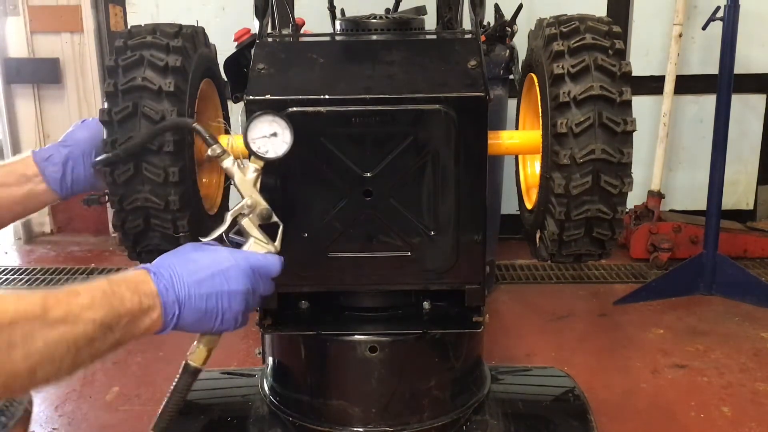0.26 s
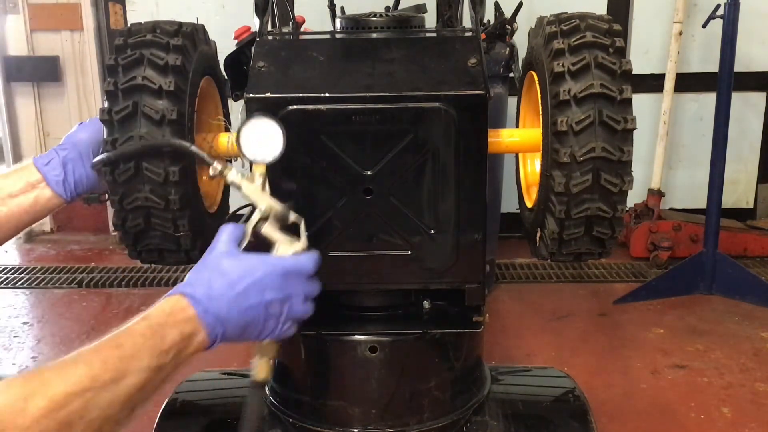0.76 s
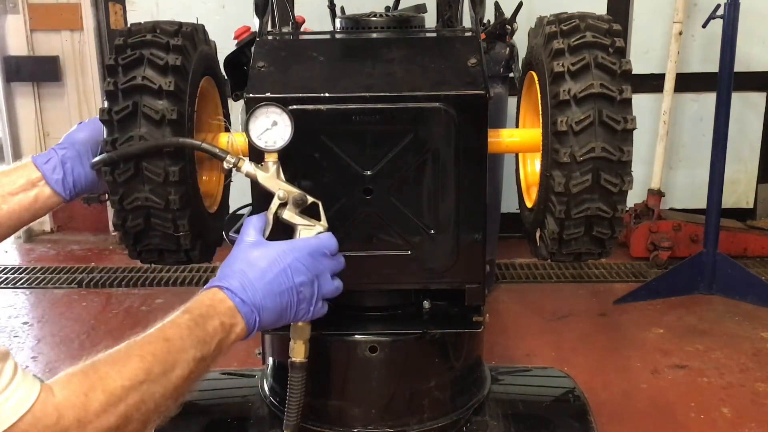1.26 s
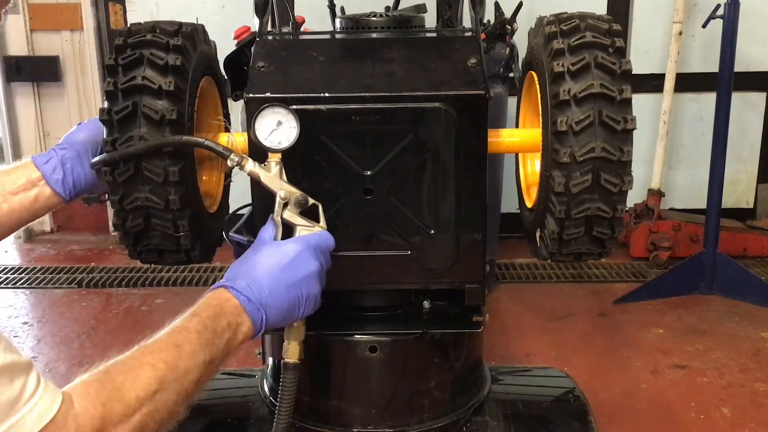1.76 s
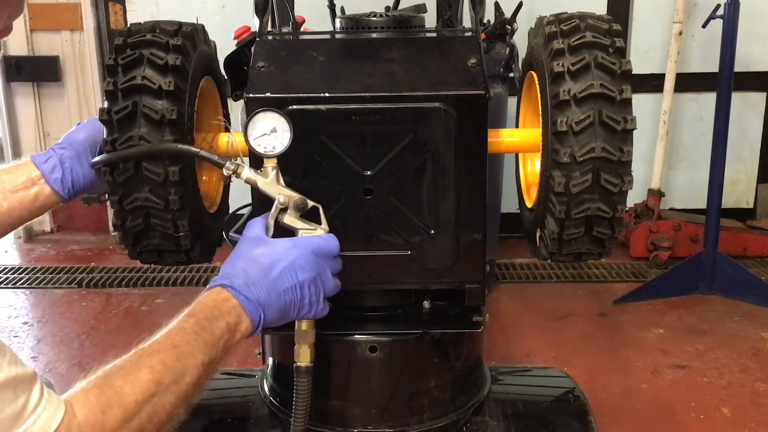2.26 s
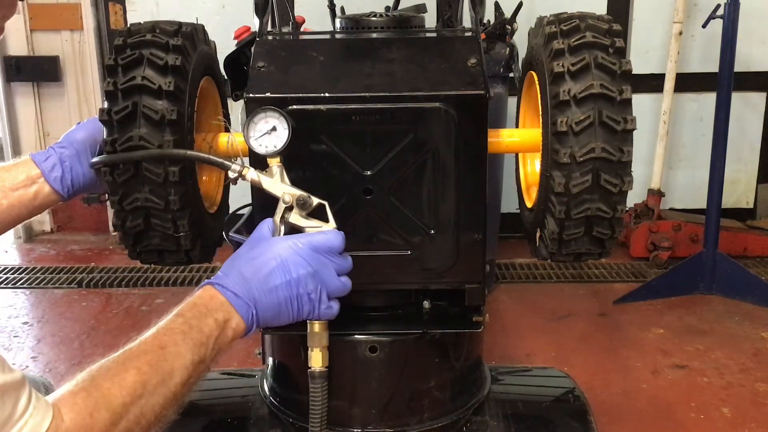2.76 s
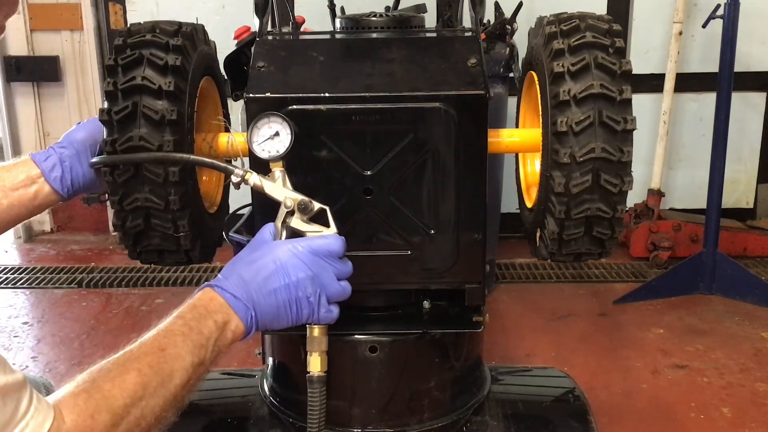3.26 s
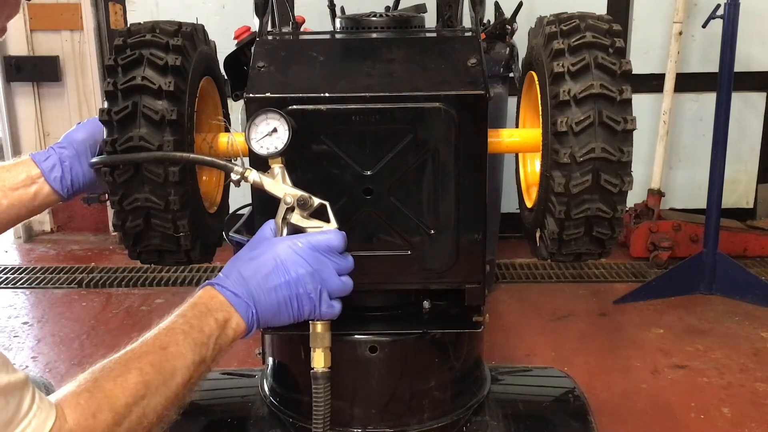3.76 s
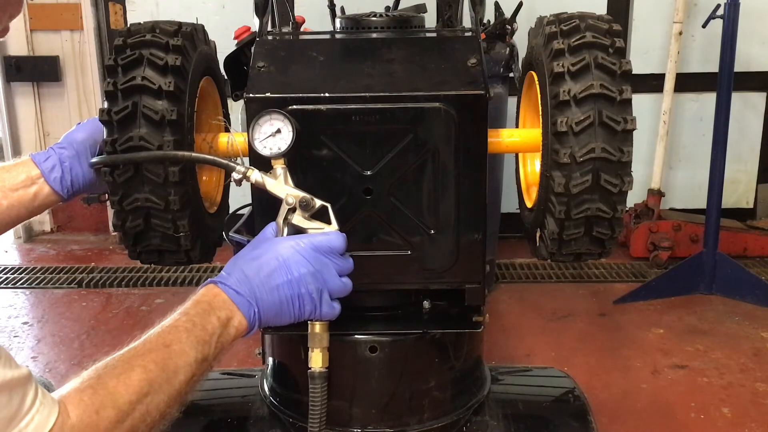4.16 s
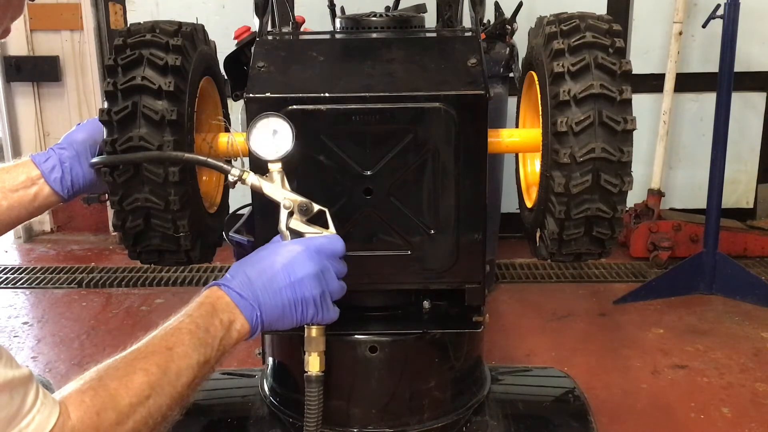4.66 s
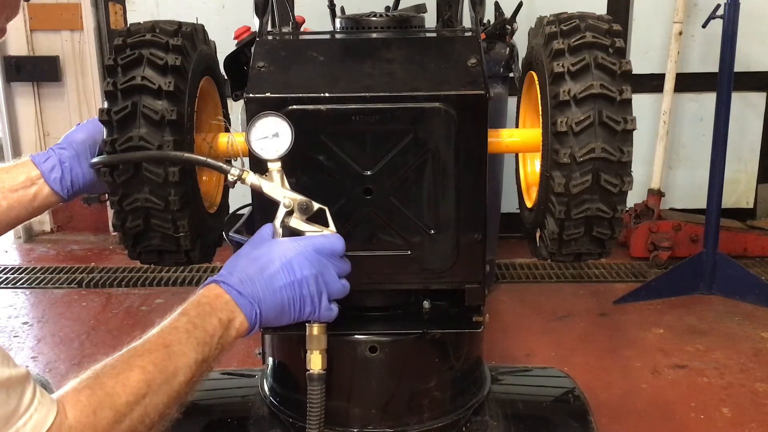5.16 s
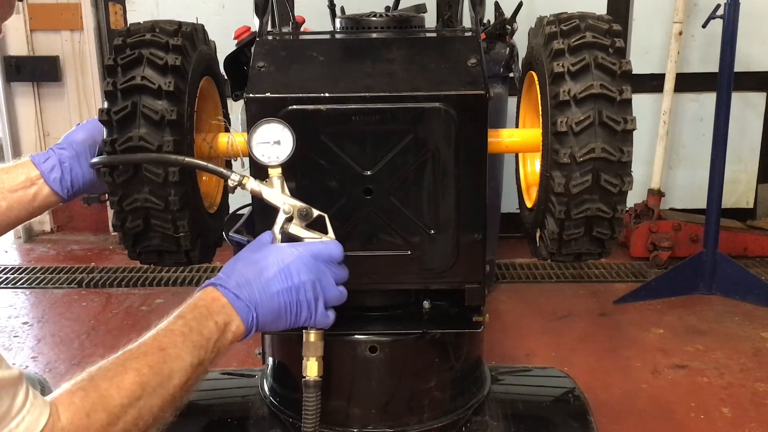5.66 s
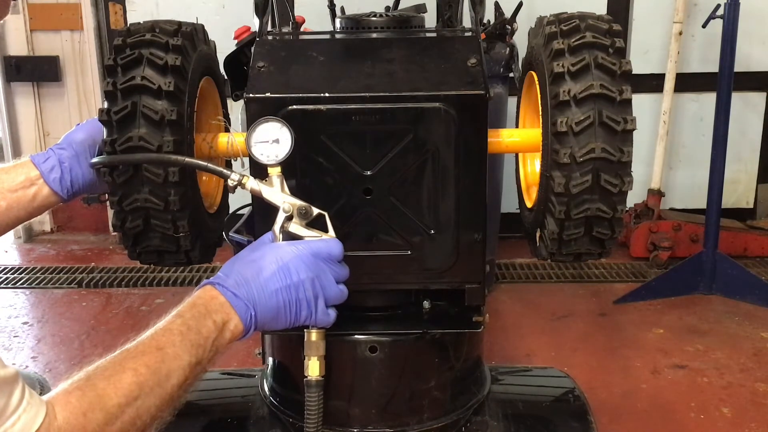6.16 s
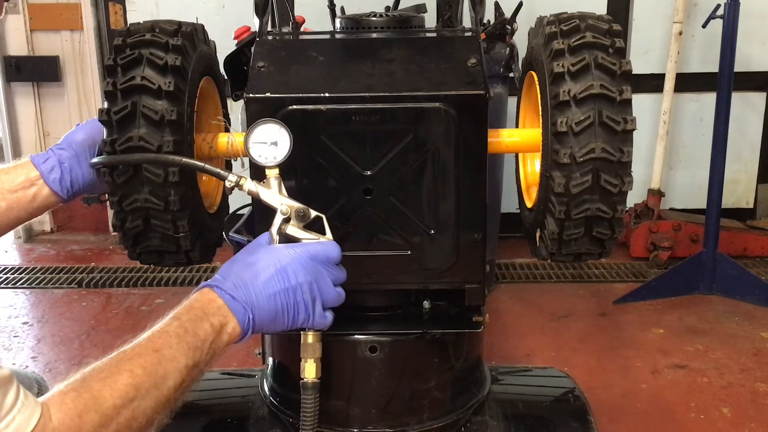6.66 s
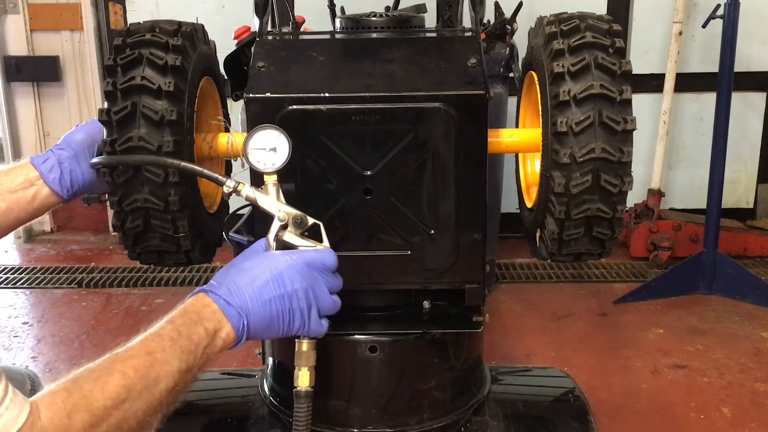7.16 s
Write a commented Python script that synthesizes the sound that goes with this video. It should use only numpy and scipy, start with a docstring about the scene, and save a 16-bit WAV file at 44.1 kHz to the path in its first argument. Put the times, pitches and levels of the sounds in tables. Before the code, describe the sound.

Soft tire bumps and small metal ticks, then brief sharp rushes of compressed air, over droning cicadas and a faint garage hum.

```python
"""A garage with its door open, where a handheld inflator fills a flat tire.
The hose bumps and the gauge clicks, dull and bright ringing modes struck by short noise cracks; then the
trigger valve snaps and air rushes in short bursts, shaped noise with a few sliding whistles.
Outside two cicadas, stacks of partials, buzz and wind down one after the other over a distant chorus of
shaped noise; the garage hums faintly."""
import sys
import numpy as np
from scipy import signal
from scipy.fft import rfft, irfft
from scipy.io import wavfile
from scipy.ndimage import uniform_filter1d

SR = 44100
rng = np.random.default_rng(int(sys.argv[2]) if len(sys.argv) > 2 else 0)


def inscribe(sig):
    """Save sig as 16-bit PCM at rate SR to the path in sys.argv[1].

    A 1-D sig is mono; a 2-D sig holds one channel per row.
    Samples are clipped to [-1, 1] before scaling.
    """
    pcm = np.round(np.clip(np.atleast_2d(sig).T, -1, 1) * 32767)
    wavfile.write(sys.argv[1], SR, pcm.astype(np.int16))


N = 326340
TIME = np.arange(N) / SR


def from_db(db):
    """Decibels to gain."""
    return np.exp(np.asarray(db) * (np.log(10) / 20))


def rms_one(x):
    """Scale to unit power."""
    return x / np.sqrt(np.mean(x ** 2) + 1e-20)


def drift(rate_hz):
    """Slow chance with spread 1: noise smoothed by two equal poles at the given rate."""
    step = 40  # drawn at every 40th sample, joined by straight lines
    settling = 2000
    pole = np.exp(-2 * np.pi * rate_hz * step / SR)
    white = rng.standard_normal(N // step + settling + 2)
    slow = signal.lfilter([1], [1, -2 * pole, pole ** 2], white)[settling:]
    return np.interp(np.arange(N) / step, np.arange(len(slow)), rms_one(slow))


def noise(colour, resonances=()):
    """Turbulence with a broad colour, lifted at its resonances; rms 1."""
    hz = np.arange(N // 2 + 1) * SR / N + 1e-6
    colour_hz, colour_db = np.transpose(colour)
    gain = from_db(np.interp(np.log(hz), np.log(colour_hz), colour_db))
    for centre_hz, width_hz, lift_db in resonances:
        bell = 1 / (1 + (2 * (hz - centre_hz) / width_hz) ** 2)
        gain = gain * np.sqrt(1 + (from_db(lift_db) ** 2 - 1) * bell)
    return rms_one(irfft(rfft(rng.standard_normal(N)) * gain, N))


def held(start, end, rise_db_per_s, fall_db_per_s):
    """A gain that rises to 1 at the start, holds, and dies away after the end."""
    before = rise_db_per_s * np.maximum(start - TIME, 0)
    after = fall_db_per_s * np.maximum(TIME - end, 0)
    return from_db(-np.minimum(before + after, 200))


def soften(x, edge_hz):
    """Low-pass: a softer or lighter contact sounds duller."""
    return signal.sosfilt(signal.butter(2, edge_hz, fs=SR, output="sos"), x)


GARAGE_T60_S = 0.84


def garage(x, wet_db):
    """Direct sound plus a dense tail from the walls, its treble dying sooner."""
    t = TIME[:SR]
    white = rng.standard_normal(SR)
    low = signal.sosfilt(signal.butter(1, 5000, fs=SR, output="sos"), white)
    high = white - low
    tail = low * from_db(-60 * t / GARAGE_T60_S) + high * from_db(-60 * t / (0.4 * GARAGE_T60_S))
    tail = tail * (t > 0.006)  # a gap before the first reflection
    echo = signal.fftconvolve(x, tail / np.linalg.norm(tail))[:N]
    return x + from_db(wet_db) * echo


def strikes(hits, modes, crack_db, crack_s):
    """Each contact is a short noise crack plus the ringing modes; a soft contact is low-passed."""
    out, t = np.zeros(N), TIME[:SR // 2]
    for start_s, level_db, *softness in hits:
        hit = from_db(crack_db) * rng.standard_normal(len(t)) * np.exp(-t / crack_s)
        for k, (hz, mode_db, t60_s) in enumerate(modes):
            ring_db = mode_db + rng.normal(0, 1) - 60 * t / t60_s
            hit += (-1) ** k * from_db(ring_db) * np.sin(2 * np.pi * hz * t)
        for edge_hz in softness:
            hit = soften(hit, edge_hz)
        at = int(start_s * SR)
        out[at:at + len(t)] += from_db(level_db) * hit[:N - at]
    return out


# Garage background. Each row: frequency in Hz, relative density in dB per Hz.
AMBIENCE_COLOUR = [(25, -21), (40, -53), (54, -2.5), (70, -7), (100, -0.5), (125, 1.5), (170, -5.5),
                   (290, -8.5), (450, -14.5), (800, -19), (1200, -23.5), (2000, -31.5), (4000, -34),
                   (16000, -57)]
AMBIENCE_DB = -59


def ambience():
    """The steady, bass-heavy noise of the garage."""
    return from_db(AMBIENCE_DB) * noise(AMBIENCE_COLOUR)


HUM_HZ, HUM_DB = 134.7, -63.5


def motor_hum():
    """A motor's single low tone, its level and phase wandering a little."""
    phase = 2 * np.pi * HUM_HZ * TIME + 0.49 * drift(3.3)
    return from_db(HUM_DB + 1.6 * drift(4.6)) * np.sin(phase)


# The distant band rises and falls. Each row: time in seconds, mean level in dB.
CHORUS_LEVEL = [(0.05, -51.5), (0.85, -55), (2.2, -52), (2.9, -50.5), (3.75, -51.5), (4.35, -50.5),
                (5.2, -54.5), (6.13, -52.5), (7.2, -52.5)]
# Their blended spectrum. Each row: frequency in Hz, relative density in dB per Hz.
CHORUS_COLOUR = [(2500, -49), (3600, -33), (4200, -22), (4800, -13), (5500, -5.5), (6500, -1), (7500, 1.5),
                 (8500, -1.5), (9400, -4), (10300, -11), (11500, -13.5), (12800, -17.5), (14500, -22.5),
                 (16000, -28)]


def distant_chorus():
    """Many far insects melt into one band of shimmering noise."""
    time_s, level_db = np.transpose(CHORUS_LEVEL)
    shimmer_db = 1.27 * drift(29)
    return from_db(np.interp(TIME, time_s, level_db) + shimmer_db) * noise(CHORUS_COLOUR)


# A tired cicada slows as this power of time and is silent once it has lost this many cycles per s.
TIRING_POWER, STALL_HZ = 2.6, 34.2


def song(pace, effort):
    """A cicada swells at a steady or climbing pace, then tires, slows and stalls: its rate and gain."""
    tires_s, top_rate, climb, slowing = pace
    full_db, full_s, swell, fade = effort
    tired = np.maximum(TIME - tires_s, 0)
    lost = np.minimum(slowing * tired ** TIRING_POWER, STALL_HZ)
    rate = top_rate - climb * np.maximum(tires_s - TIME, 0) - lost
    gain = from_db(full_db) * held(full_s, tires_s, swell, fade) * (1 - lost / STALL_HZ)
    return rate, gain


def cicada(pace, effort, partials, scatter, glide_scatter):
    """Tymbals buckle at a regular rate, giving a stack of partials that echoes in the yard make flutter."""
    rate, gain = song(pace, effort)
    phase = 2 * np.pi * (np.cumsum(rate) / SR % 1)
    # while the song slows, echoes of the earlier pitch blur each partial and make it swell and fade
    slowing = uniform_filter1d(np.maximum(-np.gradient(rate) * SR, 0), SR // 4)
    blur = scatter + glide_scatter * np.sqrt(np.abs(slowing))
    swing_db = 3.0 + 2.0 * np.tanh(slowing)
    buzz, power = 0, 0
    for multiple, partial_db in partials:
        path = rng.uniform(0, 2 * np.pi) + blur * drift(9.8)
        strength = from_db(partial_db + swing_db * drift(5.15))
        buzz = buzz + strength * np.cos((multiple * phase + path).astype(np.float32))
        power = power + strength ** 2 / 2
    # evening out the summed power leaves the loudness to the song's own gain
    return gain * buzz / np.sqrt(uniform_filter1d(power, SR // 2))


# First buzz. Each row: multiple of the tymbal rate, relative level in dB.
FIRST_PARTIALS = [(22,-29), (24,-20), (25,-23), (26,-23), (27,-20), (28,-10), (29,-15), (30,-7), (31,-15),
                  (32,-16), (33,-6), (34,-16), (35,0), (36,-10), (37,0), (38,-11), (39,-3), (40,-7),
                  (41,-14), (42,-2), (43,-9), (44,-11), (45,-10), (46,-6), (48,-16), (49,-18), (50,-20),
                  (52,-22), (55,-27)]
# Its pace: when it tires in seconds, cycles per s then, climb before it in cycles per s each s,
# cycles per s lost in the first second of tiring.
FIRST_PACE = (1.55, 194.42, 0, 1.9)
# Its effort: full level in dB, when it is reached in seconds, swell in dB per s, tired fade in dB per s.
FIRST_EFFORT = (-46, 0.62, 4, 1.3)


def first_cicada():
    """The cicada that tires first, holding a steady tymbal rate until it winds down."""
    return cicada(FIRST_PACE, FIRST_EFFORT, FIRST_PARTIALS, scatter=0.11, glide_scatter=0.31)


# Second buzz. Each row: multiple of the tymbal rate, relative level in dB.
SECOND_PARTIALS = [(18,-31), (22,-29), (26,-15), (27,-19), (28,-4), (30,-9), (31,-17), (32,-8), (34,-12),
                   (35,-14), (36,-3), (37,-15), (38,-3), (39,-8), (40,-3), (41,-8), (42,-7), (43,-9),
                   (44,-6), (45,-6), (46,-14), (47,-1), (48,-11), (49,-8), (50,-14), (51,-11), (53,-17),
                   (55,-20), (58,-21), (60,-22), (62,-19), (64,-21), (66,-23)]
# Its pace: when it tires in seconds, cycles per s then, climb before it in cycles per s each s,
# cycles per s lost in the first second of tiring.
SECOND_PACE = (5.55, 198.44, 0.61, 8.0)
# Its effort: full level in dB, when it is reached in seconds, swell in dB per s, tired fade in dB per s.
SECOND_EFFORT = (-45, 4, 3.8, 6.5)


def second_cicada():
    """The later cicada swells and its tymbals quicken before it winds down."""
    return cicada(SECOND_PACE, SECOND_EFFORT, SECOND_PARTIALS, scatter=0.14, glide_scatter=0.27)


# Hose and hand bump the tire. Each row: start in seconds, level in dB, brightness in Hz.
BUMPS = [(.1135, -35, 1010), (.119, -31.5, 402), (.138, -37, 200), (.152, -48, 300), (1.34, -47, 350)]
# How the tire rings. Each row: frequency in Hz, relative level in dB, t60 in seconds.
TIRE_MODES = [(77, -10, 0.12), (104.6, -5, 0.13), (206, -15, 0.13), (267, -8.5, 0.13), (292.5, -8, 0.2),
              (373, -11, 0.094), (615, -13, .12), (784, -6.5, 0.048), (1720, -21, .04)]


def tire_bumps():
    """Dull thuds: soft blows set the low modes of the tire ringing."""
    return garage(strikes(BUMPS, TIRE_MODES, crack_db=1.5, crack_s=0.015), wet_db=-6.5)


# Light clicks of lever and coupling. Each row: start in seconds, level in dB before the trim,
# brightness in Hz.
CLICKS = [(.2115, -34, 16000), (.384, -44, 3000), (.3912, -38.5, 5000), (.4503, -30.5, 15100),
          (.453, -34, 9100), (.672, -49.5, 15000), (.712, -49, 15000), (.9144, -49, 2500),
          (1.2252, -51, 3000), (6.692, -52, 2500)]
# How the light metal rings. Each row: frequency in Hz, relative level in dB, t60 in seconds.
LEVER_MODES = [(2390, -4.5, 0.017), (3410, -9.5, 0.017), (4580, -4, 0.022), (5840, -3, 0.018),
               (7600, 0, 0.022), (11400, -4, 0.0054), (12200, 3.5, 0.006), (14500, 1, .007)]
CLICK_TRIM_DB = -5.0


def lever_clicks():
    """Small metal parts tick: high modes that die within hundredths of a second."""
    clicks = strikes(CLICKS, LEVER_MODES, crack_db=-3, crack_s=0.0062) * from_db(CLICK_TRIM_DB)
    # small parts radiate no bass
    clicks = signal.sosfilt(signal.butter(2, 1800, "high", fs=SR, output="sos"), clicks)
    return garage(clicks, wet_db=-5.5)


# The hose knocks against the gun. Each row: start in seconds, level in dB, brightness in Hz.
KNOCKS = [(.611, -44, 990), (.628, -48, 1220), (.65, -48.5, 500)]
# How the knocked hose rings. Each row: frequency in Hz, relative level in dB, t60 in seconds.
HOSE_KNOCK_MODES = [(168, -10, 0.22), (318, -5, 0.1), (393.6, -1, 0.1), (439, 1, 0.052), (615, 1, 0.048),
                    (760, -20, 0.046), (920, -7.5, 0.087), (1480, -20, 0.087)]


def hose_knocks():
    """Muffled knocks: the hose strikes, setting its low and middle modes ringing."""
    return garage(strikes(KNOCKS, HOSE_KNOCK_MODES, crack_db=4.5, crack_s=0.019), wet_db=-6.5)


# The valve snaps open. Each row: start in seconds, level in dB.
SNAPS = [(1.7228, -34), (4.5665, -36), (5.3977, -40.5)]
# How the valve rings. Each row: frequency in Hz, relative level in dB, t60 in seconds.
VALVE_MODES = [(814, -18.5, 0.12), (1544, -8, 0.02), (2255, -13.5, 0.09), (3440, -7.5, 0.053),
               (4060, -14, 0.048), (4820, 1, 0.024), (5110, 3, 0.048)]


def valve_snaps():
    """Hard, bright snaps: the valve's metal modes ring without any softening."""
    return garage(strikes(SNAPS, VALVE_MODES, crack_db=-2, crack_s=0.0055), wet_db=-5.5)


# Squeezes of the trigger. Each row: valve open in seconds, released in seconds, rush in the hose in dB
# and jet at the valve in dB (both before make-up gain), time the jet takes to swell in seconds.
SQUEEZES = [(1.736, 1.911, -47, -55, 0.058), (4.58, 4.794, -47, -40, 0.18),
            (5.411, 5.585, -46.5, -39, 0.16), (6.361, 6.41, -53, -49, 0.063)]
# Colour of the rush. Each row: frequency in Hz, relative density in dB per Hz.
RUSH_COLOUR = [(200, -12), (450, -7), (750, -7.5), (1300, -9), (1950, -8), (2400, 1), (3300, -4.5),
               (4300, 0.5), (5200, 6.5), (6200, 7), (8000, 2.5), (10500, 9), (11500, -1), (15000, -13)]
# Air column of hose and gun. Each row: resonance in Hz, width in Hz, lift in dB.
HOSE_RESONANCES = [(716, 22, 11), (1110, 60, 11), (1540, 22, 8), (1650, 26, 17), (2160, 50, 6),
                   (2690, 40, 7), (2795, 36, 11), (3030, 22, 12), (3400, 28, 19), (3820, 24, 17),
                   (4200, 36, 12), (4295, 28, 15), (4650, 40, 8), (4755, 28, 13), (5195, 36, 14),
                   (6410, 22, 12)]
# Colour of the jet. Each row: frequency in Hz, relative density in dB per Hz.
JET_COLOUR = [(1000, -19.5), (2000, -10.5), (3000, -6), (4400, -2.5), (6000, -2.5), (8000, -2.5),
              (10500, -0.5), (12000, 3.5), (13800, 5), (15200, 6.5), (16000, 3)]
RUSH_MAKEUP_DB, JET_MAKEUP_DB = 6.0, 4.5
# the rush builds up to the opening and dies after the release
RUSH_RISE_DB_PER_S, RUSH_FALL_DB_PER_S = 393, 113
# the jet starts as the seal lifts, a little before the valve is open, and swells as a power of time
JET_LEAD_S, JET_SWELL_POWER, JET_FALL_DB_PER_S = 0.083, 1.47, 138
# the valve seats slowly and seeps on, dying away slowly; its level is before the jet's make-up gain
SEEP_FROM_S, SEEP_TO_S, SEEP_DB, SEEP_FALL_DB_PER_S = 5.6, 5.88, -62, 50.0


def air():
    """Air rushes through the resonant hose and, with the valve wide open, hisses as a gritty jet."""
    rush_gain = 0
    jet_gain = from_db(SEEP_DB) * held(SEEP_FROM_S, SEEP_TO_S, RUSH_RISE_DB_PER_S, SEEP_FALL_DB_PER_S)
    for opened, released, rush_db, jet_db, swell_s in SQUEEZES:
        flow = held(opened, released, RUSH_RISE_DB_PER_S, RUSH_FALL_DB_PER_S)
        rush_gain = rush_gain + from_db(rush_db) * flow
        gap = np.clip((TIME - opened + JET_LEAD_S) / swell_s, 0, 1)
        release = held(opened, released, 0, JET_FALL_DB_PER_S)
        jet_gain = jet_gain + from_db(jet_db) * gap ** JET_SWELL_POWER * release
    # the fast wander of the jet's level is its grit
    rush = rush_gain * from_db(RUSH_MAKEUP_DB + 0.53 * drift(50)) * noise(RUSH_COLOUR, HOSE_RESONANCES)
    jet = jet_gain * from_db(JET_MAKEUP_DB + 0.6 * drift(400)) * noise(JET_COLOUR)
    return rush + jet


# The glove scuffs on the gun. Each row: start in seconds, length in seconds, level in dB, brightness in Hz.
RUBS = [(2.69, 0.035, -65, 3200), (3.705, 0.035, -61, 2180), (7.358, 0.05, -50.5, 16000)]
# Colour of the friction. Each row: frequency in Hz, relative density in dB per Hz.
RUB_COLOUR = [(100, -19), (350, -1), (700, 5), (1400, -6), (2300, -3), (4000, -2), (7000, -5.5),
              (11000, -23), (16000, -20)]
RUB_RISE_DB_PER_S, RUB_FALL_DB_PER_S = 292, 122


def glove_rubs():
    """Short, uneven strokes of rubber on metal; a light one is duller."""
    out = np.zeros(N)
    friction = from_db(1.5 * drift(120)) * noise(RUB_COLOUR)
    for start_s, length_s, level_db, edge_hz in RUBS:
        stroke = friction * held(start_s, start_s + length_s, RUB_RISE_DB_PER_S, RUB_FALL_DB_PER_S)
        out += from_db(level_db) * soften(stroke, edge_hz)
    return out


# The valve seat whistles as its gap changes. Each row: start in seconds, length in seconds,
# first pitch in Hz, last pitch in Hz, peak level in dB.
WHISTLES = [(4.706, 0.1, 5050, 3820, -45.5), (6.305, 0.13, 6300, 4160, -52)]
# a whistle peaks after this share of its length and is this much weaker at its ends
WHISTLE_PEAK_SHARE, WHISTLE_EDGE_DB = 0.13, -16


def whistles():
    """Breathy edge tones that slide down in pitch."""
    out = np.zeros(N)
    for start_s, length_s, first_hz, last_hz, peak_db in WHISTLES:
        along = np.clip((TIME - start_s) / length_s, 0, 1)
        sounding = (along > 0) & (along < 1)
        swell_db = np.interp(along, [0, WHISTLE_PEAK_SHARE, 1], [WHISTLE_EDGE_DB, 0, WHISTLE_EDGE_DB])
        pitch_hz = first_hz * (last_hz / first_hz) ** along
        phase = 2 * np.pi * np.cumsum(pitch_hz) / SR
        # chance on both quadratures spreads the tone into a narrow, breathy band
        tone = drift(70) * np.cos(phase) + drift(70) * np.sin(phase)
        out += sounding * from_db(peak_db + swell_db) * tone
    return garage(out, wet_db=-11)


def scene():
    """The inflator close by, the insects beyond the door, one microphone."""
    background = ambience() + motor_hum()
    insects = distant_chorus() + first_cicada() + second_cicada()
    handling = tire_bumps() + lever_clicks() + hose_knocks() + valve_snaps() + glove_rubs()
    mono = background + insects + handling + air() + whistles()
    return np.array([mono, mono])


CUTOFF_HZ = 15850


def record(dry):
    """The microphone drops the deep bass; the top is cut steeply."""
    thin = signal.sosfilt(signal.butter(6, 48, "high", fs=SR, output="sos"), dry)
    return signal.sosfilt(signal.ellip(12, .1, 80, CUTOFF_HZ, fs=SR, output="sos"), thin)


dry = scene()
out = record(dry)
inscribe(out)
```